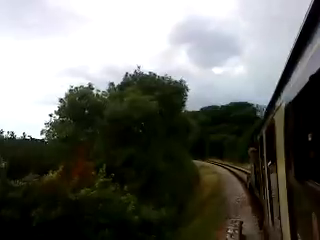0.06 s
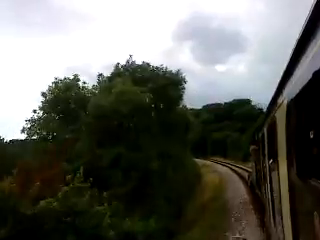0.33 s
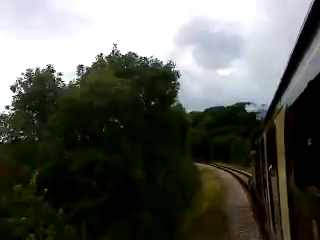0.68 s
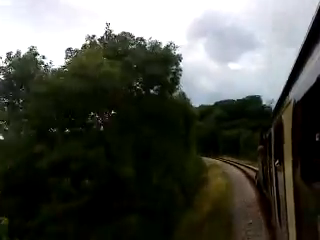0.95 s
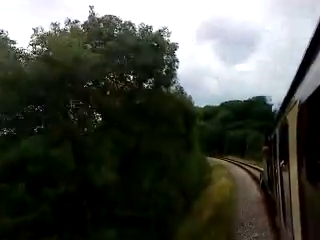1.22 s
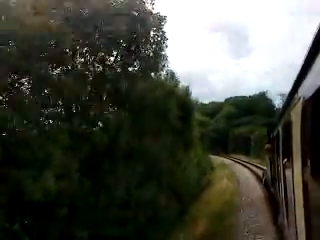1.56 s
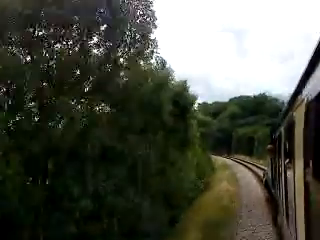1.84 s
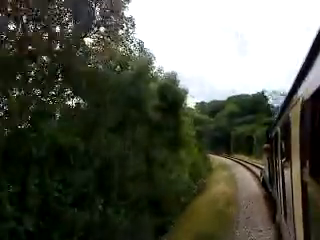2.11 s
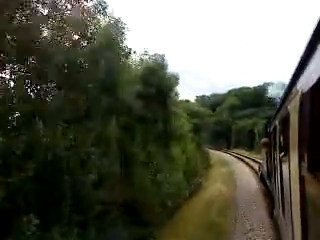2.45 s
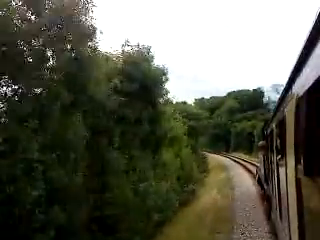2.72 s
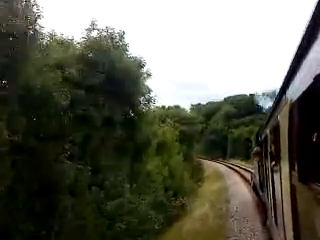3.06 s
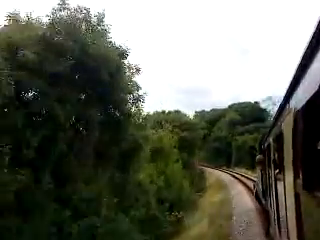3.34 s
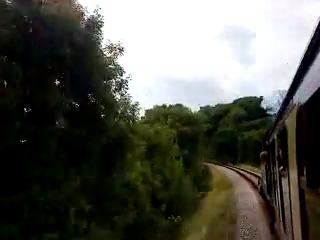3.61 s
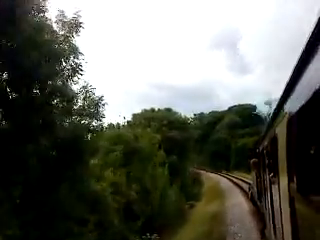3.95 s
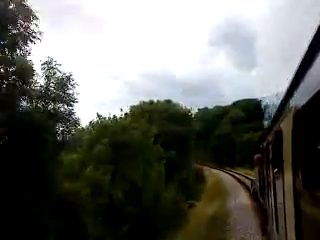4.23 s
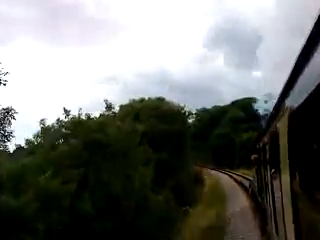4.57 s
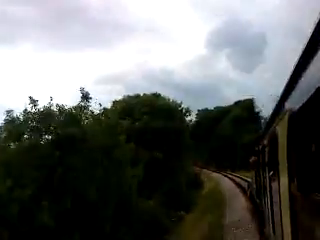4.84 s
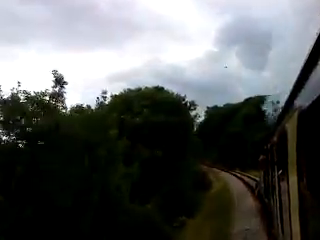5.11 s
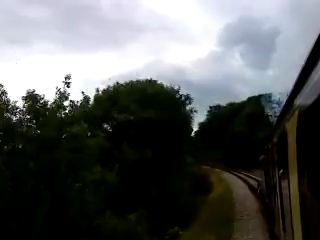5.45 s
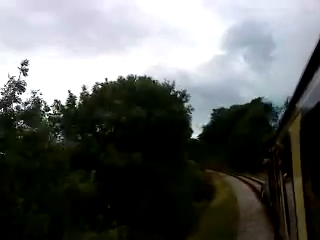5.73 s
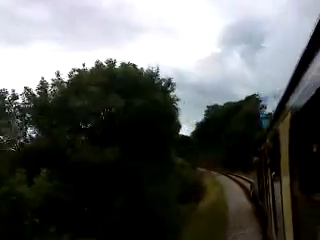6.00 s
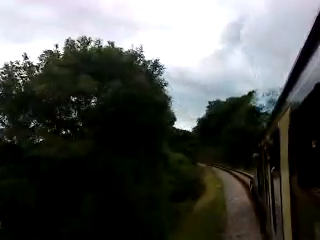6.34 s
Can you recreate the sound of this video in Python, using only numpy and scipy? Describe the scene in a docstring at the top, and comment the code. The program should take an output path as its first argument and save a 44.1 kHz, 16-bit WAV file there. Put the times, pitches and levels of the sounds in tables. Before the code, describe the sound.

From an open carriage window on a running train, the main sound is heavy wind on the microphone: a constant low rumble with rough, fluttering buffets and short distorted cracks. The gusts ease for a moment here and there, then hit again. Well behind them, a steam engine puffs about eight times a second over a soft pulsing hiss and the steady, dull roll of wheels on the track.

```python
"""At an open carriage window, a microphone is held out while a steam train rounds a bend.
The turbulent slipstream presses on it: large eddies rumble, middle ones thud, and small ones flutter
and snap in quick buffets that overload it and push its gain down. Underneath, the engine ahead chuffs
through the resonances of its chimney, four beats to a wheel turn, and the wheels roar on the rails."""
import sys
import numpy as np
from scipy import signal
from scipy.fft import rfft, irfft, next_fast_len
from scipy.io import wavfile
from scipy.ndimage import uniform_filter1d, map_coordinates

SR = 44100
rng = np.random.default_rng(int(sys.argv[2]) if len(sys.argv) > 2 else 0)


def store_pcm(level_fs):
    """Save levels as 16-bit WAV."""
    pcm = np.round(np.clip(level_fs, -1, 1) * 32767).astype(np.int16)
    wavfile.write(sys.argv[1], SR, np.atleast_2d(pcm).T)


N = 281358
TIME = np.arange(N) / SR

# Hard eddies that hit the microphone. Each row: centre in seconds, duration in seconds,
# relative level in dB, brightness in dB (more gives more treble).
HARD_EDDIES = [(0.057, 0.0041, -19, 4), (0.082, 0.0089, -23, -17), (0.145, 0.0092, -14, -11.5),
               (0.161, 0.0088, -18, -2), (0.198, 0.021, -27.5, -27), (0.243, 0.0053, -15, -16),
               (0.257, 0.0038, -6.5, -8), (0.278, 0.0071, -11.5, -11), (0.324, 0.0034, -12, -14),
               (0.338, 0.0068, -17, 3), (0.347, 0.0046, -15, -6), (0.388, 0.022, -18, -4.5),
               (0.451, 0.018, -13, -6.5), (0.491, 0.016, -19, -19), (0.511, 0.0063, -7, -23),
               (0.552, 0.013, -7.5, -4), (0.567, 0.006, -9.5, -13), (0.584, 0.0058, -12, -4),
               (0.596, 0.021, -12.5, -5), (0.626, 0.0085, -5.5, -4.5), (0.818, 0.015, -22, -17),
               (0.853, 0.033, -14.5, -3), (0.894, 0.013, -19, -5), (0.936, 0.025, -18, -11.5),
               (0.996, 0.03, -14.5, -7), (1.025, 0.0079, -14, -22), (1.077, 0.0067, -10.5, -7),
               (1.093, 0.0066, -11.5, -8), (1.154, 0.006, -19, -10), (1.186, 0.022, -19, -7.5),
               (1.24, 0.022, -19.5, -12.5), (1.267, 0.014, -20, -19), (1.284, 0.0093, -18.5, -10.5),
               (1.305, 0.019, -21.5, -9), (1.338, 0.004, -4.5, -13.5), (1.36, 0.012, -19, -3),
               (1.377, 0.0046, -7.5, -3.5), (1.409, 0.029, -20.5, -12), (1.435, 0.0085, -22, -13),
               (1.473, 0.017, -20, -20), (1.51, 0.0058, -18, -15), (1.538, 0.024, -14.5, -3),
               (1.572, 0.029, -18.5, -10), (1.639, 0.048, -21.5, -3.5), (1.685, 0.022, -24, -9.5),
               (1.717, 0.015, -12.5, -3), (1.746, 0.027, -15.5, -2.5), (1.846, 0.033, -15.5, -9),
               (1.877, 0.024, -18.5, -2.5), (1.899, 0.012, -21, -9), (1.941, 0.018, -19, -7),
               (1.957, 0.006, -3.5, -4), (1.988, 0.0052, -13.5, -6.5), (2.014, 0.0046, -12.5, -3),
               (2.039, 0.0053, -15, -5), (2.078, 0.039, -17, -7), (2.108, 0.006, -17, -11),
               (2.139, 0.0075, -16.5, -5), (2.176, 0.013, -17.5, -4), (2.202, 0.024, -16, -13),
               (2.265, 0.016, -18.5, -9.5), (2.347, 0.0258, -14, -1), (2.373, 0.01, -20, -5),
               (2.412, 0.013, -17.5, -5.5), (2.436, 0.024, -20, -14), (2.491, 0.0051, -13, -14),
               (2.502, 0.0077, -14, -6), (2.518, 0.0099, -11, -2.5), (2.536, 0.014, -13, 0),
               (2.557, 0.02, -13, -6.5), (2.584, 0.0087, -24, -3.5), (2.632, 0.011, -16.5, -6.5),
               (2.686, 0.015, -22.5, -10), (2.787, 0.013, -16.5, -15), (2.812, 0.035, -23, -5.5),
               (2.84, 0.01, -17, -8.5), (2.859, 0.017, -20, -13), (2.871, 0.0071, -17.5, -3),
               (2.965, 0.0055, -11.5, -13), (2.984, 0.016, -25, -13), (3.005, 0.0072, -20, -12.5),
               (3.072, 0.0054, -15.5, -14), (3.092, 0.022, -29.5, -3), (3.241, 0.019, -16, -15.5),
               (3.324, 0.022, -7.5, -11), (3.345, 0.012, -16, -9.5), (3.379, 0.0057, -17.5, -9),
               (3.429, 0.012, -22, -24), (3.448, 0.05, -27, -5), (3.477, 0.011, -10, -9.0),
               (3.493, 0.0074, -16, -7), (3.507, 0.018, -16.5, -18), (3.536, 0.016, -20.5, -6),
               (3.561, 0.015, -19, -7), (3.59, 0.018, -15, -6.5), (3.663, 0.0065, -15.5, -8),
               (3.703, 0.0053, -23, -8), (3.722, 0.006, -17.5, -1.5), (3.758, 0.0082, -19.5, -9),
               (3.808, 0.011, -18, -11.5), (3.834, 0.0075, -23.5, -6), (3.858, 0.024, -18.5, -13),
               (3.884, 0.0068, -18, -12), (3.916, 0.0091, -18.5, -8), (3.926, 0.0085, -20, -7.5),
               (3.978, 0.031, -21, -3), (4.025, 0.014, -23.5, -3), (4.05, 0.0043, -22.5, 3),
               (4.065, 0.0096, -20, -2.5), (4.083, 0.009, -20.5, -5.5), (4.123, 0.0092, -15, -14),
               (4.143, 0.016, -18, -8.5), (4.175, 0.013, -21.5, -4), (4.237, 0.04, -25, -0.5),
               (4.269, 0.0097, -16, -1.5), (4.339, 0.014, -22, -12), (4.408, 0.0086, -4.5, -7.5),
               (4.437, 0.0046, -10, -15.0), (4.459, 0.033, -24.5, -8.5), (4.501, 0.012, -18.5, -9.5),
               (4.559, 0.033, -20.5, -6), (4.581, 0.0039, -14, -13), (4.632, 0.033, -19, -10.5),
               (4.666, 0.021, -21, -3.5), (4.691, 0.02, -23, -10), (4.722, 0.0038, -12.5, -6.5),
               (4.741, 0.0073, -20, -18), (4.766, 0.035, -26, -11.5), (4.818, 0.016, -14, -8),
               (4.839, 0.0092, -20, -9.5), (4.916, 0.0042, -12.5, -15), (4.952, 0.024, -15.5, -3),
               (4.987, 0.0036, -15, -5), (5.024, 0.0059, -21, -8), (5.036, 0.0083, -21, -3),
               (5.085, 0.0074, -9.5, -10.5), (5.103, 0.01, -23, -6), (5.116, 0.0066, -17.5, -9),
               (5.132, 0.0057, -25, -9), (5.151, 0.012, -21, -10), (5.176, 0.021, -20, -11),
               (5.205, 0.0046, -11.5, -1.0), (5.249, 0.012, -27, -3), (5.27, 0.021, -16, -2),
               (5.313, 0.015, -19.5, -3), (5.328, 0.011, -15, -6.5), (5.389, 0.0063, -15, -5),
               (5.427, 0.012, -14.5, -14.5), (5.441, 0.0037, -20, -4), (5.459, 0.0057, -18, -8),
               (5.477, 0.018, -18, -10), (5.517, 0.0062, -17, -14), (5.643, 0.011, -12, -4),
               (5.713, 0.0047, -10, -4), (5.741, 0.003, -7.5, -9), (5.771, 0.005, -17, -6),
               (5.797, 0.0026, -29, -5), (5.843, 0.0077, -24, 2), (5.907, 0.009, -18.5, -4.5),
               (5.918, 0.0054, -9.5, -6), (5.963, 0.0076, -16.5, -20), (6.097, 0.028, -19.5, -5.5),
               (6.172, 0.046, -18.5, -9), (6.216, 0.018, -21, -2.5), (6.233, 0.0037, -17, -10),
               (6.287, 0.013, -17, -27), (6.337, 0.013, -16.5, 3)]
# Broad eddies that thump on it. Each row: centre in seconds, duration in seconds, relative level in dB.
BROAD_EDDIES = [(0.074, 0.023, -23), (0.162, 0.02, -28), (0.223, 0.018, -19), (0.365, 0.019, -24),
                (0.445, 0.011, -13.5), (0.584, 0.041, -14.5), (0.606, 0.023, -9), (0.861, 0.021, -18),
                (0.94, 0.014, -26), (1.001, 0.025, -23), (1.092, 0.029, -13), (1.525, 0.039, -20.5),
                (1.663, 0.054, -17.5), (1.744, 0.028, -19), (1.904, 0.025, -12.5), (1.957, 0.025, -16),
                (2.009, 0.019, -12.5), (2.08, 0.063, -18.5), (2.141, 0.022, -15.5), (2.212, 0.018, -13.5),
                (2.339, 0.015, -8.5), (2.538, 0.015, -3.5), (2.806, 0.014, -15), (2.955, 0.019, -15.5),
                (3.179, 0.017, -16), (3.209, 0.053, -14.5), (3.306, 0.024, -13), (3.438, 0.039, -13),
                (3.476, 0.015, -12), (3.585, 0.044, -15), (3.668, 0.041, -17), (3.804, 0.019, -18.5),
                (3.88, 0.038, -25), (3.923, 0.02, -12.5), (4.004, 0.033, -19.5), (4.195, 0.014, -13),
                (4.649, 0.035, -15), (4.725, 0.032, -15), (4.962, 0.028, -20), (5.036, 0.028, -18.5),
                (5.101, 0.022, -16.5), (5.279, 0.018, -12), (5.7, 0.021, -16), (5.74, 0.035, -15.5),
                (5.91, 0.017, -15), (6.103, 0.023, -13), (6.215, 0.027, -13.5), (6.333, 0.026, -11.5)]
# Bursts of the hardest eddies. Each row: time in seconds, relative peak in dB, low-pass cutoff in Hz.
SNAPS = [(0.2555, -15, 1400), (0.274, -23, 1590), (0.339, -19, 1800), (0.376, -24, 1300),
         (0.4271, -14, 1360), (0.4553, -16, 2190), (0.5099, -13, 1570), (0.5474, -6, 2620),
         (0.586, -16, 2570), (0.599, -17, 4500), (0.6297, -8, 3480), (0.8432, -11, 2070),
         (0.8627, -5, 1600), (0.9868, -18, 2400), (0.9923, -13, 2200), (1.0801, -9.5, 1700),
         (1.3354, -17, 2100), (1.376, -11, 2300), (1.3961, -12.5, 1500), (1.5377, -13.5, 2100),
         (1.5812, -10, 1900), (1.7157, -15, 2000), (1.7436, -13, 2280), (1.7546, -18, 2000),
         (1.7678, -14, 1700), (1.8438, -13, 1460), (1.8541, -8.5, 1340), (1.8807, -11, 1900),
         (1.9292, -14, 3000), (1.9567, -13, 3620), (1.9829, -15, 2200), (2.014, -14.5, 3360),
         (2.062, -24, 1900), (2.0951, -14.5, 2380), (2.3452, -16, 3800), (2.3541, -8.5, 2800),
         (2.4126, -10.5, 1700), (2.488, -17, 1200), (2.5148, -16, 3530), (2.5208, -8, 1600),
         (2.5398, -11.5, 3230), (2.8687, -20.5, 2000), (3.308, -11.5, 1400), (3.333, -7, 1610),
         (3.4774, -19, 2570), (3.4876, -14.5, 1700), (3.58, -9, 1400), (3.9838, -16.5, 1900),
         (4.2705, -16.5, 2570), (4.3327, -16.5, 1590), (4.4074, -16, 2170), (4.4101, -13, 3350),
         (4.9512, -10.5, 4070), (4.9617, -26, 1400), (5.0357, -20, 1600), (5.0816, -13, 2070),
         (5.1634, -13, 1340), (5.2071, -8, 1400), (5.2659, -14.5, 3780), (5.274, -22, 1900),
         (5.3142, -10.5, 1600), (5.3886, -15, 1570), (5.4251, -19, 1900), (5.614, -17.5, 1700),
         (5.641, -19, 2800), (5.7172, -15, 1980), (5.7354, -10.5, 1900), (5.8464, -9.5, 2100),
         (5.9177, -18, 1700), (6.0944, -11, 2070), (6.183, -12.5, 1600), (6.3381, -16, 3950)]
# Force of the slipstream. Each row: time in seconds, relative dB of large eddies, then of smaller ones.
SLIPSTREAM = [(0, -20.5, -22), (0.55, -18, -22), (0.68, -18, -24), (0.78, -18, -28), (0.85, -18, -25),
              (1.15, -24, -25), (1.75, -18, -23.5), (2.2, -20.5, -25), (2.45, -20, -27.5),
              (2.54, -24, -18.5), (2.6, -29, -25), (2.85, -19, -29), (3.1, -28.5, -24.5), (3.3, -22.5, -27),
              (3.55, -19, -25.5), (4.1, -18, -26), (4.35, -21, -26.5), (4.7, -19, -28.5), (5.55, -21, -25),
              (5.95, -22, -24), (6.33, -16.5, -26.5)]
# Exhaust beats, about eight a second. Each row: start in seconds, relative level in dB.
CHUFFS = [(0.055, -45), (0.179, -41), (0.304, -36.5), (0.422, -33.5), (0.55, -33.5), (0.674, -54),
          (0.798, -39), (0.919, -37), (1.043, -38), (1.169, -46), (1.293, -37.5), (1.416, -41),
          (1.54, -39.5), (1.663, -40), (1.787, -43), (1.911, -39), (2.035, -43), (2.159, -40.5),
          (2.282, -37), (2.406, -38), (2.53, -39), (2.655, -45.5), (2.78, -36.5), (2.899, -41.5),
          (3.025, -40), (3.148, -49), (3.271, -36.5), (3.397, -37.5), (3.52, -44.5), (3.643, -44.5),
          (3.766, -38.5), (3.891, -42.5), (4.015, -44), (4.14, -53), (4.264, -51), (4.387, -40.5),
          (4.512, -43), (4.637, -50), (4.762, -45), (4.886, -41.5), (5.011, -46), (5.135, -48),
          (5.26, -41.5), (5.385, -39), (5.525, -39), (5.635, -44.5), (5.78, -49), (5.886, -44),
          (6.012, -44), (6.137, -45), (6.261, -36.5)]
# Strength of the steam's hiss. Each row: time in seconds, relative level in dB.
HISS_LEVELS = [(0.0, -45.5), (0.3, -49), (0.47, -46), (0.7, -50.5), (0.85, -52), (0.96, -49.5), (1.31, -50),
               (1.54, -47.5), (2.2, -51.5), (2.55, -48), (2.8, -51.5), (2.93, -47), (3.2, -43),
               (3.32, -47.5), (3.43, -44.5), (3.7, -48), (4.16, -52), (4.42, -54.5), (4.54, -49),
               (4.77, -52.5), (4.91, -50.5), (5.15, -52.5), (5.54, -49), (5.82, -49), (6.38, -48.5)]
# Spectra of large, middle and small eddies, chimney resonances, escaping steam and rolling wheels.
# Each row: frequency in Hz, relative spectral density in dB.
RUMBLE_SPECTRUM = [(10, -22.5), (22, 1.5), (55, 2.5), (85, -1.5), (115, -3), (170, -22.5), (300, -80)]
THUD_SPECTRUM = [(60, -12), (100, -14), (130, 4), (210, -0.5), (290, -5.5), (400, -13), (800, -70)]
FLUTTER_SPECTRUM = [(200, -1.5), (320, 0.5), (500, -1), (700, -4), (1000, -7.5), (1400, -13.5),
                    (2000, -21.5), (2800, -35.5), (4000, -47), (8000, -79)]
CHIMNEY_SPECTRUM = [(1200, -11), (1600, -7), (1900, 3.5), (2200, 2), (2420, -3), (2650, 2.5), (2950, -6),
                    (3600, -10), (4500, -7), (5400, -17.5), (8000, -37.5)]
STEAM_SPECTRUM = [(600, -3.5), (1500, 7.5), (2200, 8.5), (3000, 4.5), (3700, 5), (4600, 4), (5250, -0.5),
                  (5800, 0.5), (6400, 2), (7700, -0.5), (9000, -18.5)]
ROLLING_SPECTRUM = [(30, 8), (120, 1.5), (220, 1.5), (340, -5), (450, -9), (900, -21.5), (1500, -31.5),
                    (2100, -26.5), (4000, -35), (8000, -48)]


def wind(rumble_db=-0.18, thud_db=-1.5, flutter_db=-8.0, fitful_db=7.5):
    """Turbulent pressure: one flow drives eddies of every size, and the larger ones sound lower."""
    large_db, small_db = in_time(SLIPSTREAM)
    eddies = [*HARD_EDDIES, *weak_eddies()]
    strength, bright_db = buffets(eddies, small_db + flutter_db + fitful_db * np.tanh(drift(39)))
    broad = thumps()
    rumble_swell = swell(np.hypot(strength, broad), seconds=0.016, depth=0.49)
    rumble = from_db(large_db + rumble_db) * rumble_swell * steady(noise(RUMBLE_SPECTRUM), seconds=0.13)
    thud_swell = from_db(small_db + thud_db) * swell(strength, seconds=0.0011, depth=0.43)
    thuds = np.hypot(thud_swell, broad) * steady(noise(THUD_SPECTRUM), seconds=0.027)
    return rumble + thuds + spent_gain() * turbulence(strength, bright_db) + snaps()


def weak_eddies(per_s=24, length_s=0.006, level_db=-2, clearance_s=0.0081):
    """Intermittency: weak eddies fill the gaps between hard ones; the rows are as in HARD_EDDIES."""
    lateness, stretch, _, brightening = rng.uniform(-0.39, 1, (300, 4)).T
    s = (np.arange(len(lateness)) + lateness / 2) / per_s
    _, small_db = in_time(SLIPSTREAM)
    eddy_db = np.interp(s, TIME, small_db) + level_db
    bright_db = -12 + 7 * brightening
    rows = np.column_stack([s, length_s * np.exp(0.18 * stretch), eddy_db, bright_db])
    hard_s, hard_length = np.transpose(HARD_EDDIES)[:2]
    clear = np.all(np.abs(s[:, None] - hard_s) > hard_length / 2 + clearance_s, axis=1)
    return rows[clear & (s > 0) & (s < TIME[-1])]


def buffets(eddies, flutter_db, calm_bright_db=-7.5):
    """Incoherent addition: eddies and flutter sum in power, which also weights their mean brightness."""
    power = from_db(flutter_db) ** 2
    weighted_brightness = power * calm_bright_db
    for s, duration, level_db, bright_db in eddies:
        near, gate = passage(s, duration, rise_s=0.0005, fall_s=0.0015)   # arrives faster than it leaves
        eddy_power = (from_db(level_db) * gate) ** 2
        power[near] += eddy_power
        weighted_brightness[near] += eddy_power * bright_db
    return np.sqrt(power), weighted_brightness / power


def thumps(level_db=-3.5, edge_s=0.0017):
    """Broad eddies add in power, giving the envelope of separate dull thumps."""
    power = np.zeros(N)
    for s, duration, thump_db in BROAD_EDDIES:
        near, gate = passage(s, duration, edge_s, edge_s)
        power[near] += (from_db(thump_db + level_db) * gate) ** 2
    return np.sqrt(power)


def passage(s, duration, rise_s, fall_s):
    """Convection carries an eddy past: the samples around time s, and a soft-edged gate over them."""
    near = slice(max(int((s - 2 * duration) * SR), 0), int((s + 2 * duration) * SR))
    t = TIME[near] - s
    arriving = (1 + np.tanh((t + duration / 2) / rise_s)) / 2
    leaving = (1 - np.tanh((t - duration / 2) / fall_s)) / 2
    return near, arriving * leaving


def swell(strength, seconds, depth):
    """Amplitude modulation: larger eddies follow the buffets, more slowly and less deeply."""
    return steady(np.abs(smooth(strength, seconds)) ** depth, seconds=0.29)


def turbulence(strength, bright_db, level_db=-1.5, tear_db=2.5, usual_bright_db=-4.5):
    """Energy cascade: eddies tear into smaller ones, each burst both louder and brighter."""
    tearing = np.clip(drift(190), -2, 2)
    tilt_db_per_octave = 0.89 * np.minimum(bright_db - usual_bright_db, 6.0) + 1.13 * tearing
    rest, air = smallest_eddies(), np.zeros(N)
    for hz, top_hz in zip(np.geomspace(250, 8000, 11), np.geomspace(300, 9600, 11)):
        band = signal.sosfiltfilt(flat_filter(3, top_hz), rest)   # peel off half an octave, in phase
        rest = rest - band
        octaves = np.clip(np.log2(hz / 550), -0.6, 2.2)
        air += band * from_db(tilt_db_per_octave * octaves)
    torn = steady(air * from_db(tear_db * tearing), seconds=0.005)   # tearing only shifts energy about
    return from_db(level_db) * strength * torn


def smallest_eddies(per_s=1700, hiss_share=0.26):
    """Shot noise: separate pressure kicks of either sign, in a little even noise."""
    kicks = (rng.random(N) < per_s / SR) * rng.uniform(-0.86, 1, N)
    return coloured(rms_one(kicks) + hiss_share * rng.standard_normal(N), FLUTTER_SPECTRUM)


def snaps(level_db=-2.5, leak_hz=600, shred_count=4, scatter_s=0.003, shred_share=0.5, size=1024):
    """Impulse response: a bursting eddy's pressure kick leaks away quickly, amid weaker shreds."""
    out = np.zeros(N + size)
    leaking = signal.sosfilt(flat_filter(1, leak_hz, "high"), signal.unit_impulse(size))
    for s, peak_db, cutoff_hz in SNAPS:
        kick = signal.sosfilt(flat_filter(3, cutoff_hz), leaking)
        kick *= from_db(peak_db + level_db) / kick.max()
        chance = rng.uniform(-0.98, 1, (1 + shred_count, 2))
        polarity = np.sign(chance[0, 0])
        shreds = chance[1:] * [scatter_s, shred_share]
        for late_s, share in [(0, polarity), *shreds]:
            start = int((s + late_s) * SR) - np.argmax(kick)
            out[start:start + size] += share * kick
    return out[:N]


def spent_gain(dip_db=-2, half_width_s=0.0044):
    """Energy depletion: a snap uses up its eddy, so the turbulence dips around it."""
    nearness = np.zeros(N)
    for s, _, _ in SNAPS:
        near, gate = passage(s, 2 * half_width_s, half_width_s / 2, half_width_s / 2)
        nearness[near] = np.maximum(nearness[near], gate)
    return from_db(dip_db * nearness)


def engine(chuff_db=-3.0, hiss_db=-0.5, waver_db=0.46, rise_s=0.031, decay_s=0.043):
    """Pulsed flow: each exhaust beat swells and decays in the chimney, over a pulsing hiss of steam."""
    power = np.full(N, from_db(-54.5) ** 2)   # the floor between beats
    for s, level_db in CHUFFS:
        near = slice(int(s * SR), int((s + 0.5) * SR))
        t = np.abs(TIME[near] - s)
        opening = np.sin(np.pi / 2 * np.minimum(t / rise_s, 1)) ** 2
        decay = np.exp(-np.maximum(t - rise_s, 0) / decay_s)
        power[near] += (from_db(level_db) * opening * decay) ** 2
    chuffs = from_db(chuff_db) * np.sqrt(power) * chimney()
    steam_db, = in_time(HISS_LEVELS)
    pulsing = steady(power ** 0.16, seconds=0.48)
    hiss = from_db(steam_db + hiss_db + waver_db * drift(7.9)) * pulsing * noise(STEAM_SPECTRUM)
    return chuffs + hiss


def chimney(wander=0.035, wander_hz=5.0):
    """Pipe resonance: noise in the chimney's modes, whose pitch wanders a little from beat to beat."""
    position = np.cumsum(1 + wander * np.tanh(drift(wander_hz)))
    return map_coordinates(noise(CHIMNEY_SPECTRUM), [position], order=3, mode="mirror")


def wheels(level_db=-29.5, waver_db=2.0):
    """Rolling noise: wheels on rail make a continuous low roar that wavers in level."""
    return from_db(level_db - waver_db * drift(5.3)) * noise(ROLLING_SPECTRUM)


def noise(spectrum):
    """Random noise shaped to a spectrum, rms 1."""
    return coloured(rng.standard_normal(N), spectrum)


def coloured(source, spectrum):
    """Spectral shaping: a white source takes on a spectrum read on a log-frequency axis, rms 1."""
    size = next_fast_len(N)
    hz = np.fft.rfftfreq(size, 1 / SR)
    point_hz, point_db = np.transpose(spectrum)
    gain = from_db(np.interp(np.log(hz + 1e-3), np.log(point_hz), point_db))
    return rms_one(irfft(rfft(source, size) * gain, size)[:N])


def drift(corner_hz):
    """Random fluctuation: noise smoothed by two low-pass poles, rms 1."""
    pole = np.exp(-2 * np.pi * corner_hz / SR)
    return rms_one(signal.lfilter([1], [1, -2 * pole, pole * pole], rng.standard_normal(N + SR))[SR:])


def flat_filter(order, hz, kind="low"):
    """Sections of a filter with a maximally flat passband."""
    return signal.butter(order, hz, kind, fs=SR, output="sos")


def steady(x, seconds):
    """Normalisation holds the short-term rms near 1."""
    return x / np.sqrt(np.abs(smooth(x ** 2, seconds)) + 1e-9)


def smooth(x, seconds):
    """Two running means make a triangular average."""
    size = max(int(seconds * SR), 1)
    return uniform_filter1d(uniform_filter1d(x, size), size)


def in_time(rows):
    """Linear interpolation gives each column of a curve at every sample."""
    s, *columns = np.transpose(rows)
    return [np.interp(TIME, s, column) for column in columns]


def rms_one(x):
    """Normalisation to rms 1."""
    return x / np.sqrt(np.mean(x ** 2) + 1e-20)


def from_db(db):
    """Decibels as an amplitude ratio."""
    return 10 ** (np.asarray(db) / 20)


def scene():
    """Superposition: wind on the microphone and the running train add in one channel."""
    return (wind() + engine() + wheels())[None]


def record(dry, knee_db=-1.5, edge_db=18.5, squeeze=0.66, attack_s=0.0015, release_db_per_s=55,
           ceiling=0.45, hardness=3.45, cutoff_hz=8350):
    """Compression and saturation: sharp blows duck the gain, peaks round off, and the top is cut."""
    sensed = np.abs(dry[0] + from_db(edge_db) * np.gradient(dry[0]))   # steep edges count for more
    over_db = np.maximum(20 * np.log10(sensed + 1e-9) - knee_db, 0) * squeeze
    recovery_db = release_db_per_s * TIME
    duck_db = np.maximum.accumulate(over_db + recovery_db) - recovery_db
    pole = np.exp(-1 / (attack_s * SR))
    ducked = dry * from_db(-signal.lfilter([1 - pole], [1, -pole], duck_db))
    saturated = ducked / (1 + np.abs(ducked / ceiling) ** hardness) ** (1 / hardness)
    return signal.sosfilt(flat_filter(28, cutoff_hz), saturated)


dry = scene()
out = record(dry)
store_pcm(out)
```